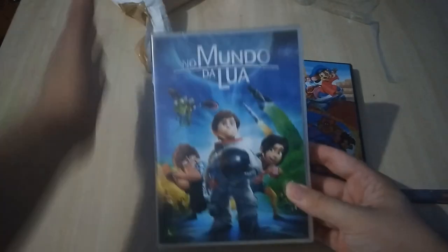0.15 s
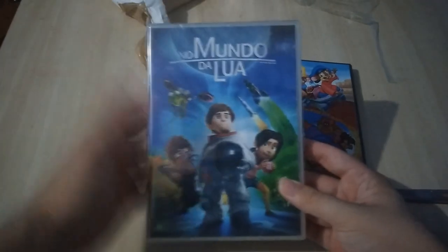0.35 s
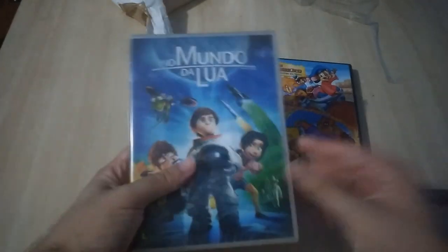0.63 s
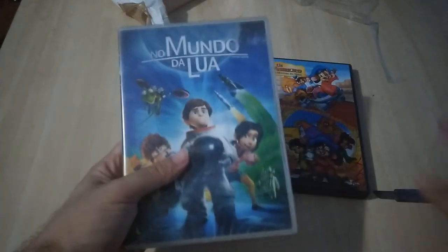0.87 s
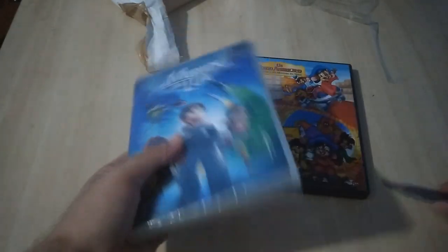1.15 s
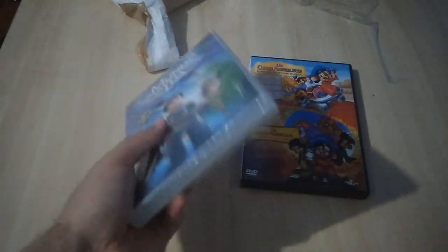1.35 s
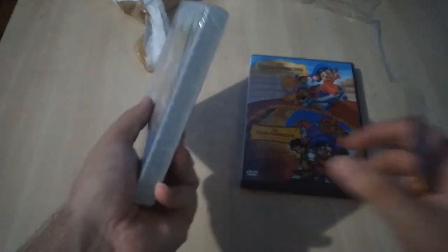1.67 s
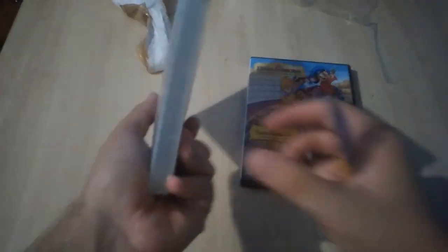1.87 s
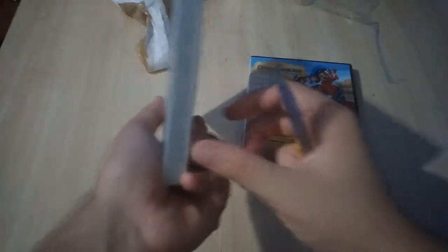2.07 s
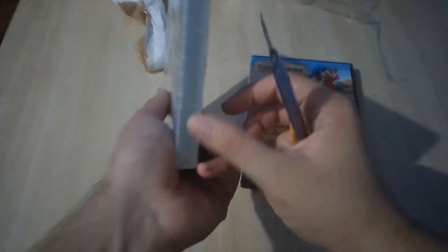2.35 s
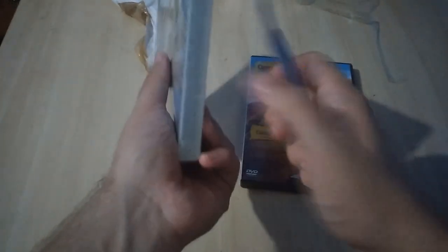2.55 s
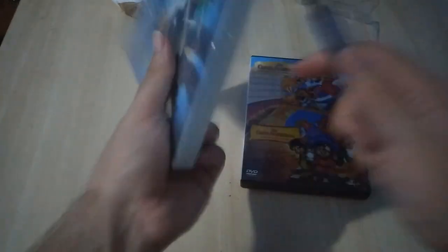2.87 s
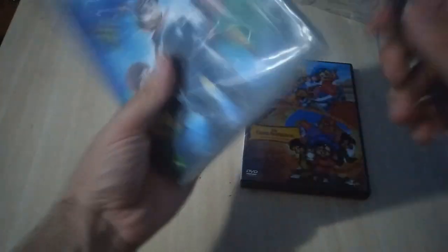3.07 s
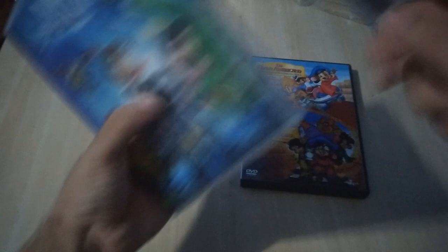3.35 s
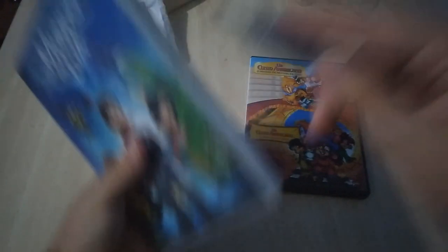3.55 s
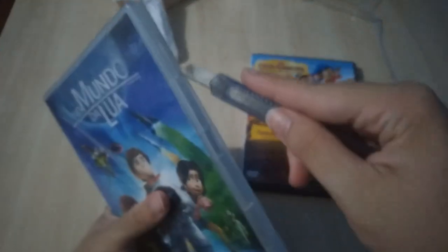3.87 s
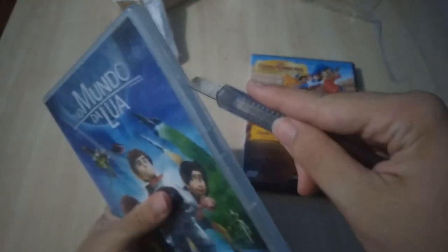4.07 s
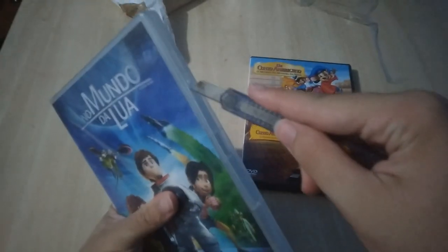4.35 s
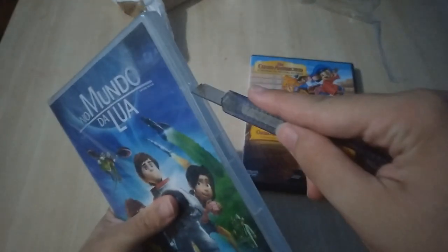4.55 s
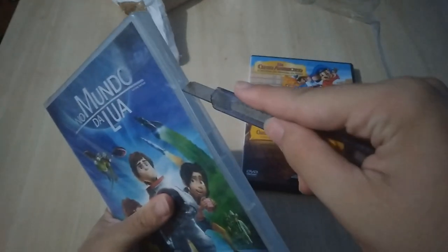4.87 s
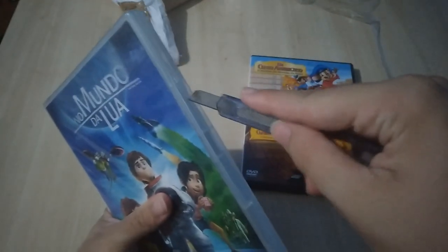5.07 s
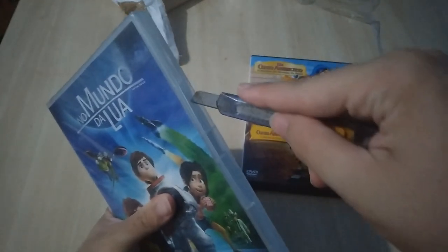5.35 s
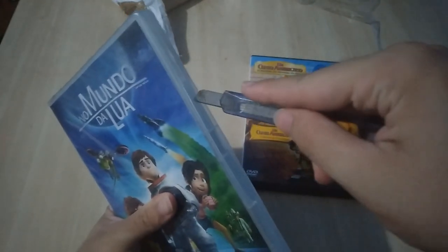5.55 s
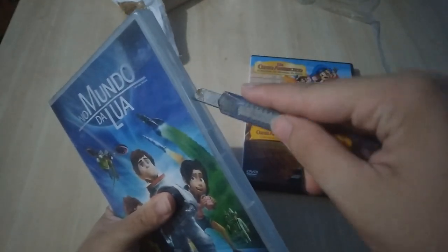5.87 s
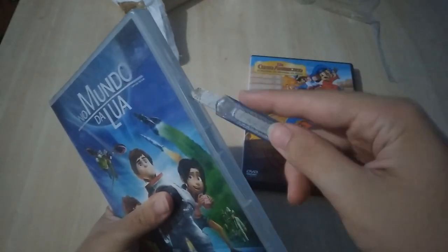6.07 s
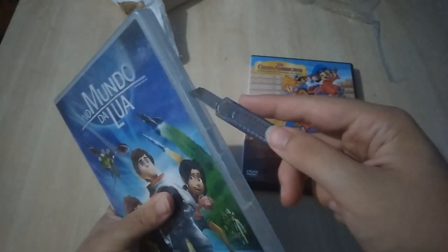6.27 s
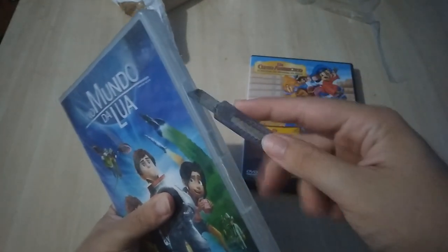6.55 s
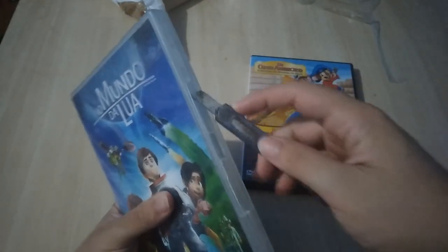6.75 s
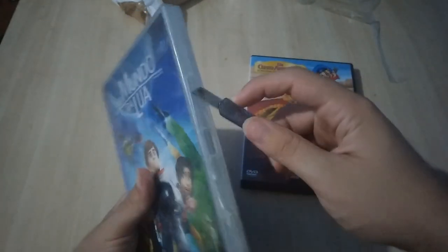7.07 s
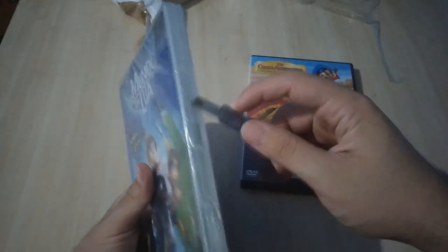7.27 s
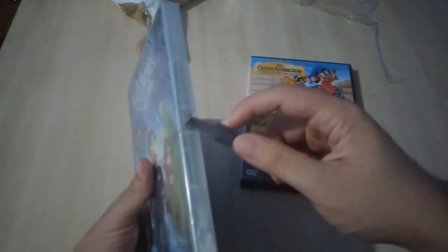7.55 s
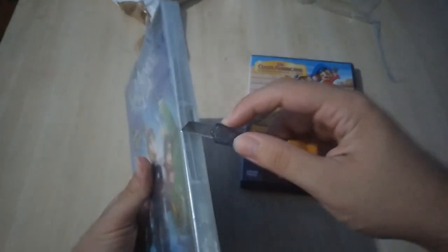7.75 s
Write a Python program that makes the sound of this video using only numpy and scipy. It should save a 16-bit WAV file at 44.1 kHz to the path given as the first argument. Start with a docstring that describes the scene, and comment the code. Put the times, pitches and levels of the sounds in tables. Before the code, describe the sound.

Crisp, very short snaps of thin plastic wrap and dull hollow knocks of a light case, heard very near with a short bright room tail. Crackling is thick until about three and a half seconds, then thins to isolated ticks from careful picking with a blade. One strong crack and knock interrupts, and crinkling returns at the end. Muffled low thuds, a brief hollow drone and faint distant toots sit underneath.

```python
"""A film-wrapped plastic case is turned in the hands and picked at with a knife, close to a stereo microphone.
The film snaps in short noise rattles and crinkles in random grains; the hollow case knocks in ringing modes.
A bare room answers with early echoes and a noise tail. Behind the walls low rumbles, a hum and a hollow
drone swell as resonant noise; faint toots of narrow noise come from afar, over a steady hiss."""
import sys
import numpy as np
from scipy import signal
from scipy.fft import rfft, irfft, next_fast_len
from scipy.io import wavfile
from scipy.ndimage import uniform_filter1d

SR = 44100
rng = np.random.default_rng(int(sys.argv[2]) if len(sys.argv) > 2 else 0)


def log_audio(samples):
    """Write samples as a 16-bit WAV file to the path given in sys.argv[1]."""
    # one column per channel
    frames = np.atleast_2d(samples).T
    # limit to full scale, then quantise
    limited = np.clip(frames, -1, 1)
    pcm = np.round(limited * 32767).astype(np.int16)
    wavfile.write(sys.argv[1], SR, pcm)


N = 348831

# film flexing between snaps: start_s, level_db
CRINKLE_LEVEL = [(0.0, -43), (0.31, -81), (0.59, -66), (1.08, -99), (1.28, -52.5), (2.77, -57.5),
                 (2.95, -41.5), (3.57, -72), (3.72, -89), (5.59, -67.5), (5.79, -79.5), (6.19, -84.5),
                 (6.39, -79.5), (6.83, -80.5), (7.29, -54.5), (7.53, -52), (7.71, -83), (7.91, -86)]
# colour of the crinkling film: pitch_hz, level_db (per Hz)
FILM_COLOUR = [(880, -53), (1500, -22.5), (1890, -28), (3120, -14.5), (4570, -20.5), (6890, -2.5),
               (9790, 2.5), (14600, -3.5), (16500, -21)]
GRAINS_PER_S, GRAIN_SPREAD_DB, GRAIN_MS, CRINKLE_ROOM_DB = 170, 8.5, 0.8, 2.5

# swells of the low rumble: start_s, level_db
RUMBLE_LEVEL = [(0.0, -85), (0.06, -57.5), (0.15, -44), (0.28, -64), (0.57, -78), (0.66, -54.5),
                (0.79, -73), (1.06, -69.5), (1.12, -54.5), (1.23, -71.5), (2.31, -68.5), (2.42, -58),
                (2.46, -74.5), (2.6, -45), (2.93, -71.5), (3.0, -47.5), (3.06, -60), (3.21, -49),
                (3.37, -60), (3.52, -44.5), (3.74, -51), (3.81, -64), (3.88, -51.5), (3.96, -59.5),
                (4.12, -45.5), (4.27, -61), (4.4, -73), (4.49, -49.5), (4.67, -55.5), (5.02, -59),
                (5.15, -72), (5.38, -55), (5.42, -41.5), (5.62, -65), (5.84, -73), (5.95, -55), (6.04, -65),
                (6.12, -46), (6.32, -68), (6.52, -61.5), (6.7, -71.5), (6.89, -55), (7.12, -76),
                (7.2, -65.5), (7.58, -68), (7.62, -53.5), (7.84, -73), (7.91, -57.5)]
# resonances of the low rumble: pitch_hz, width_hz, level_db
RUMBLE_MODES = [(35, 30, -23), (86, 14, -9.5), (112.6, 8.8, -8.5), (127, 12, -3.5), (139, 30, -7),
                (174.3, 18, -10.5)]
# swells of the hum above it: start_s, level_db
HUM_LEVEL = [(0.0, -83), (0.06, -47), (0.11, -40), (0.35, -93), (0.99, -68), (1.59, -91), (2.25, -70),
             (2.95, -70.5), (2.97, -62), (3.24, -69.5), (4.47, -80.5), (4.54, -68.5), (5.26, -81.5),
             (5.4, -54.5), (5.73, -89.5), (6.17, -68), (6.21, -77.5), (6.59, -63), (6.74, -79.5),
             (7.01, -50.5), (7.12, -81), (7.16, -55.5), (7.27, -64.5), (7.4, -50), (7.87, -65), (7.91, -54)]
# resonances of the hum: pitch_hz, width_hz, level_db
HUM_MODES = [(191, 24, -3), (236, 4.9, -1.5), (274.2, 25, -4.5)]

# colour of the hiss: pitch_hz, level_db (per Hz)
HISS_COLOUR = [(15, -30), (25, -13), (60, -3.5), (135, -7.5), (202, -3.5), (245, -9), (584, -11.5),
               (726, -16), (1600, -18.5), (4730, -25.5), (8830, -23.5), (14800, -43.5), (16500, -43.5)]
HISS_DB = -74   # level between 440 and 16000 Hz

# snaps of the film: start_s, level_db (peak before panning), body_db, lower_treble_db, top_db (all three
# re the main band), pan_db (left minus right), length_ms, room_db (send re level_db)
SNAPS = [(0.0004, -26.5, -8, -11, -26, -6, 1.04, 19), (0.0543, -20.5, -14, -9.5, -20, -2, 1.9, 19),
         (0.1023, -15.5, -4, -10, -23, 9, 2.76, 13), (0.1165, -23, -18, -18, -15, -16, 1.1, 15),
         (0.4524, -30.5, -3, -4, -25, 2.5, 4, 14), (0.579, -41, -31, -32.5, -2, -1.5, 1.9, 22.5),
         (0.6008, -25.5, -43, -34, -10, -12, 2.2, 15), (0.61, -31, -46, -27, -19, 14, 2.2, 17.5),
         (0.6582, -16, -36, -15, -19, -1, 1.74, 14), (0.671, -23, -42, -12, -12, 16, 2.9, 1),
         (0.6844, -20, -43, -18, -12, 8, 1.95, 6), (1.0688, -47, -24, -25, -20, 10.0, 1.4, 14),
         (1.0887, -17, -16, -17, -7, 4, 2.1, 17), (1.1042, -0.5, -22, -12, -30.5, 3.0, 2.18, 10),
         (1.265, -21, -20.5, -14.5, -22, 12, 2.3, 17.5), (1.2824, -22, -24, -15, -12, 5, 2.1, -1),
         (1.347, -28, -42, -8, -23, 8, 2.5, 12), (1.399, -29, -43, -36, -13, 6, 2.1, 10),
         (1.444, -24, -31, -19, -13, 1, 2.1, 11), (1.4711, -18, -28, -21, -10.5, 3, 2.5, 6.5),
         (1.5293, -20, -27, -27, -7, 13, 2.3, 3), (1.5335, -9, -25, -22, -12.5, -0.5, 2.95, 7),
         (1.5604, -34, -27, -30, -5, -1.5, 2.1, 5), (1.5842, -23, -22, -30, -5, 1.0, 1.9, 8),
         (1.6262, -39, -32, -24, 7, 4, 1.9, 5), (1.6401, -11.5, -41, -31, -4.5, -2, 2.4, -4),
         (1.6564, -22, -24, -12.5, -17, 5, 1.84, 14), (1.6651, -21, -35, -27, -25, -7, 1.4, 1),
         (1.6904, -24, -35, -14, -23, 4, 2.2, 11), (1.701, -21, -43, -33, -13, -19.5, 1.2, 4),
         (1.7393, -26.5, -34, -15, -12, 5, 1.6, 10), (1.7633, -24.5, -15, -16, -34, 3.0, 1.73, 12),
         (1.8093, -23, -35, -33, -17, -6, 1.4, 6), (1.8218, -24, -42, -42, -16, 0.5, 2, 2),
         (1.8453, -26, -39, -34, -9, 3, 1.9, 1), (1.8756, -16, -61, -53, -11, -15, 1.9, 4.5),
         (1.9069, -19, -33, -48, -18.5, 4, 2.17, 10.5), (1.9222, -22, -40, -29, -14, 7, 1.9, 5),
         (1.9891, -26, -49, -44, -17, 5, 2.9, 8), (2.043, -23.5, -36, -38, -16, -1.5, 3.1, 12),
         (2.1242, -38.5, -43, -36, -27, 10, 2.3, 7), (2.1813, -15, -23, -49, -7, -8, 2.3, 10.5),
         (2.2562, -16.5, -9.5, -24, -6, -1, 2.3, 1.5), (2.278, -26.5, -15, -28, -16, -13, 2, 9),
         (2.304, -19, -12.5, -33, -18, 1.5, 2.8, 6.5), (2.3111, -20.5, -36, -28, -11, -16, 2.2, 13.5),
         (2.3655, -25.5, -38, -29, -7, -1.5, 1.7, 1), (2.3965, -18, -52, -46, -8, -5, 1.9, 7),
         (2.4665, -11.5, -45, -29, -1, -2.0, 2.3, 7), (2.4907, -8, -23.5, -27, -10.5, -9.5, 2.73, 8.5),
         (2.5599, -12, -20.5, -19, -20, -2, 1.74, 8.5), (2.605, -27.5, -26, -12, -25, 11, 3.1, 8.5),
         (2.7306, -15.5, -19, -10, -28, -3.5, 1.7, 10), (2.7451, -27.5, -10, 1.5, -23, 13.5, 2.2, 11),
         (2.781, -19, -25, -29, -21, -7, 1.9, 12.5), (2.8251, -18, -12, -7, -12, 1, 1.3, 10),
         (2.8327, -5, -16, -23, -23, 8, 1.34, 8), (2.8564, -14, -19, -9, -14, -2, 1.4, 4),
         (2.88, -24, -31, -25, -24, 3.5, 1.9, 5), (2.9257, -21, -25, -26, -15, -1.5, 1.6, 3),
         (2.9503, -16, -27, -29, -15, 6, 2.8, 7), (2.9628, -12.5, -13, -17, -12, -5, 2.4, 8),
         (2.998, -14, -15.5, -7, -14, 6, 1.56, 11.5), (3.019, -17, -20, -22, -16, -13, 1.7, 1),
         (3.0784, -19.5, -20, -5, -27, 5, 1.9, 12.5), (3.0881, -13.5, -11, -6, -16, -4.5, 3.1, 8),
         (3.0928, -14, -23, -4, -7, 12, 2.4, 1), (3.1412, -20, -10, -8, -20, -1, 2.1, 11.5),
         (3.1502, -24, -10, -11, -24, 9, 2, 9), (3.1687, -31, -3, -3, -21, 6, 2, -1),
         (3.2198, -26, -22, -9, -16, -13, 2.2, 11), (3.2247, -30.5, -15, 7, -15, 14, 4.1, 3),
         (3.2857, -34, -38, -13, -18, 8, 1.9, 14), (3.3226, -31.5, -42, -17, -21, -2, 1.9, 3),
         (3.3433, -25.5, -52, -23, -6, 6, 1.64, 10), (3.3523, -26.5, -58, -10.5, -20, -4, 2.1, 10),
         (3.423, -27, -15.5, -29, -12, -2, 2.2, 8.5), (3.4345, -26.5, -47, -28, -13, 6, 2.4, 17),
         (3.556, -37.5, -49, -49, -11, -19, 2.1, 14), (3.6107, -26.5, -29, -40, -17, 0.5, 1.8, 13),
         (3.6424, -40, -40, -29, -16, -4, 1.5, 10), (3.676, -34.5, -41, -19, -14, -10, 2.2, 8),
         (3.686, -34, -48, -8, -21, 12, 1.46, 6.5), (3.9053, -46.5, -8, -11, -27, 7, 2.2, 14),
         (3.987, -23, -52, -13, -24, -0.5, 2.3, 10.5), (4.0322, -22.5, -47, -8.5, -25, -4.5, 1.4, 4.5),
         (4.149, -37.5, -29, -10, -15.5, 2.5, 1.3, 15.5), (4.1647, -32.5, -39, -5, -23, -19, 1, 1.5),
         (4.326, -27.5, -47, -17.5, -12.5, -8.5, 1.47, 11), (4.5366, -33.5, -37, -34, -23, 9.5, 1.8, 15.5),
         (4.576, -27.5, -22, -21, -34, 0, 1.9, 8.5), (4.6428, -21.5, -51, -18, -12, -6, 2.3, 7),
         (4.7381, -29, -41, -36, -19.5, -5, 1.92, 1.5), (5.0295, -19.5, -33, -17.5, -21, -9.5, 1.8, 11.5),
         (5.0548, -22, -26, -6.5, -20, 2.5, 2.2, 6.5), (5.113, -24.5, -41, -21, -29, -4, 2.8, 4.5),
         (5.1939, -27.5, -7, -18, -28.5, -1, 2.2, 5), (5.3861, -1.5, -16.5, -16.5, -10, -4, 2.75, 9.5),
         (5.392, -10, -19, -6, -23, 9, 2.4, 8), (5.3983, -6.5, -19, -19, -16.5, 6, 1.5, 22.5),
         (5.406, -23, -33, -25, -17, -12, 1.6, 13), (5.4107, -7.5, -31, -17, -14, -8, 1.9, 17.5),
         (5.8493, -41.5, -11, -7, -28, 6, 2.6, 10), (6.1728, -14, -52, -23, -32, 6.5, 1.46, 8),
         (6.197, -32, -33, -14, -20, -1, 1.9, 13), (6.2176, -22, -27, -16, -20, 1, 3.1, 7.5),
         (6.232, -29, -38, -22.5, -27, 3.5, 1.9, 9), (6.254, -26.5, -46, -32, -34.5, 7.0, 1.6, 3),
         (6.3765, -43, -24, -1.5, -49, 8, 2.2, 9.5), (6.4556, -22, -46, -12.5, -24, 2.5, 2.46, 9.5),
         (6.5325, -29, -19, -20.5, -17.5, -1, 1.87, 9), (6.5791, -25, -47, -6, -33.5, 5, 3.1, 8.5),
         (6.7531, -38.5, -32.5, -16, -11.5, 9.5, 1.9, 16.5), (6.8533, -42, -34, -31.5, -9, 6, 1.5, 20),
         (6.8969, -28.5, -50, -34, -18, 10, 2.4, 16.5), (6.988, -35, -42, -40, -24, -3.5, 2.6, 4),
         (7.0585, -39.5, -41, -38, -8, -20, 1.3, 20.5), (7.1062, -18, -17.5, -9.5, -25, 2.5, 2.44, 12),
         (7.1202, -23.5, -5, -10, -10, 0, 2.4, 5), (7.1469, -8.5, -9, -5.5, -21, -1.0, 2.76, 5),
         (7.1632, -21, -20, -9, -24, 5, 2.1, 3), (7.2284, -39, -19, -26, -16, -1, 1.9, 7),
         (7.2993, -33.5, -37, -8, -19, -6, 1.5, 17.5), (7.3358, -34, -26, -17, -17, -4, 1.6, 22.5),
         (7.3569, -13.5, -14.5, -15.5, -21.5, -4, 1.78, 8), (7.4233, -30, -40, -29, -34, 2, 2, -2),
         (7.4854, -33, -22, -22, -12, -6, 1.6, 11), (7.5005, -10, -15, -16.5, -23, 2, 1.4, 10.5),
         (7.512, -12, -7, -25, -5, -3, 3.4, -1), (7.5217, -5.5, -15.5, -11, -17, 1, 3.2, 5.5),
         (7.5654, -17, -32, -32, -12, 8, 1.9, 11.5)]
CRACK = 0.54   # one sharp slip at the height of each rattle, re a rattle of unit energy
CENTRE_HZ, CENTRE_HZ_PER_DB, USUAL_TOP_DB = 8014, 56.5, -14   # a snap with more top also sits higher

# decay of the room: pitch_hz, t60_s
ROOM_DECAY = [(150, 0.39), (500, 0.48), (2000, 0.5), (5000, 0.52), (9000, 0.44), (15000, 0.21)]
# table top and near walls: delay_s, level_db
ECHOES = [(.0017, -8), (.0068, -24), (.0095, -62.5)]
ROOM_DB, ROOM_BUILD_S, ROOM_FADE_DB = -33.5, 0.00087, 902.5   # tail level, time to fill, extra fall per s cubed
LEFT_LAG = 7   # samples

# knocks of the case: start_s, level_db (before a fixed trim), low_thump_db, upper_modes_db (re middle modes)
KNOCKS = [(0.056, -33.5, 7.5, 0), (0.089, -37.5, 8.5, 9.5), (0.107, -24, -1.5, 1.5), (0.456, -42.5, -30, 3),
          (0.489, -49, -35, -20), (1.106, -48, -8, 16), (1.267, -58.5, -5, 12), (1.535, -58.5, -7, 18),
          (1.641, -54, -15, 13), (2.04, -50.5, -18, 7), (2.199, -58.5, -7.5, 14), (2.302, -54, 5, 7.5),
          (2.491, -51, -2, -22), (2.937, -55.5, -3, 13), (2.963, -41.5, -12, 5), (3.087, -56.5, -0.5, 10),
          (3.168, -49.5, -9, -27), (3.905, -71, -8, 25), (4.573, -72, -7, 29), (5.051, -54.5, -27, 16),
          (5.387, -26, -7.5, 12), (5.409, -26.5, -10, 0), (6.219, -46, -22, 4), (7.105, -46.5, -27, -4.5),
          (7.146, -54, 0, 14), (7.37, -54.5, -6, 9), (7.521, -33, -7.5, 3.5)]
# ringing modes of the hollow case: pitch_hz, level_db, t60_s
CASE_MODES = [(205, -20, .05), (253, 4, 0.069), (337, 7.5, 0.12), (409, 7, 0.05), (481.5, 10, 0.034),
              (720.4, -7.5, 0.13), (798.7, 8.5, 0.076), (916, 20, 0.012), (1097, 17.5, 0.0093),
              (1254, 1.5, 0.02), (1335, 6.5, 0.011), (1601, 8.5, .025), (2170, 2.5, 0.017),
              (3170, -4, .025)]
SLAP_DB = 10   # re the modes of the case

# faint toots from afar: centre_s, level_db, pitch_hz, length_s
TOOTS = [(1.063, -70, 787, 0.18), (1.231, -59, 800, 0.041), (1.478, -57, 845, 0.081),
         (1.856, -63.5, 815, 0.15), (2.473, -63, 780, 0.09), (3.07, -61, 802, 0.032),
         (3.215, -70, 803, 0.27), (3.707, -65.5, 770, 0.11), (4.321, -63, 774, 0.032),
         (4.276, -70.5, 593, 0.13), (5.84, -72.5, 600, .08), (6.88, -62, 784, 0.087)]
# swells of the hollow drone: start_s, level_db
DRONE_LEVEL = [(1.8, -87), (1.884, -68), (1.94, -79), (2.086, -55), (2.182, -62), (2.298, -51.5),
               (2.45, -81)]
# resonances of the drone: pitch_hz, width_hz, level_db
DRONE_MODES = [(308, 13, -20), (367, 18.6, 3.5), (418.5, 18, -10), (463.7, 9.3, -0.5)]

# colour difference of the microphone's ports: pitch_hz, left_minus_right_db
PORT_COLOUR = [(60, 4), (200, 6.5), (700, 1), (2400, 6.5), (4500, 4), (6500, 8.5), (8500, 1), (10500, -7),
               (15000, 4)]
CUTOFF_HZ = 16750


def from_db(db):
    """Decibels to an amplitude factor."""
    return 10 ** (np.asarray(db) / 20)


def rms_one(x):
    """Scale to an overall rms of one."""
    return x / np.sqrt(np.mean(x ** 2) + 1e-20)


def unit(x):
    """Scale each row to unit energy."""
    return x / np.linalg.norm(x, axis=-1, keepdims=True)


def level_curve(rows):
    """A level in dB at every sample; silent outside its span, but held if it reaches the end of the scene."""
    s, level_db = np.transpose(rows)
    after_db = level_db[-1] if s[-1] > 7.8 else -150
    return np.interp(np.arange(N) / SR, s, level_db, left=-150, right=after_db)


def at_hz(points, hz):
    """Read a spectrum at any pitch, on a log pitch scale."""
    pitch_hz, values = np.transpose(points)
    return np.interp(np.log(hz), np.log(pitch_hz), values)


def high_pass(x, hz):
    """Gently remove what lies below a pitch."""
    return signal.sosfilt(signal.butter(2, hz, "high", fs=SR, output="sos"), x)


def band(x, low_hz, high_hz):
    """Keep one band of the spectrum."""
    edges = [low_hz, min(high_hz, .45 * SR)]
    return signal.sosfilt(signal.butter(2, edges, "band", fs=SR, output="sos"), x)


def steep_band(x, low_hz, high_hz):
    """A band with a sharper lower edge, of unit energy."""
    return unit(high_pass(band(x, low_hz, high_hz), low_hz * 0.79))


def colour(x, points):
    """Tilt a sound by a spectrum in dB."""
    size = next_fast_len(x.shape[-1])
    hz = np.arange(1, size // 2 + 2) * SR / size
    tilted = irfft(rfft(x, size) * from_db(at_hz(points, hz)), size)
    return tilted[..., :x.shape[-1]]


def resonate(x, hz, width_hz):
    """A single resonance: the narrower it is, the longer it rings."""
    r = np.exp(-np.pi * width_hz / SR)
    return signal.lfilter([1 - r * r, 0, r * r - 1], [1, -2 * r * np.cos(2 * np.pi * hz / SR), r * r], x) / 2


def add(out, near, far, s, pan_db, room_db):
    """Mix a short sound in at a time: rows left, right and what goes into the room."""
    i = round(s * SR)
    gains = from_db([[pan_db / 2], [-pan_db / 2], [room_db]])
    out[:, i:i + len(near)] += gains * np.array([near, near, far])[:, :N - i]


def crinkle():
    """Tiny creases at random moments, of very uneven size and side, their colour changing every few ms."""
    sizes = from_db(GRAIN_SPREAD_DB * np.minimum(rng.exponential(1, N), 3))
    starts = rng.random(N) < GRAINS_PER_S / SR
    sides = from_db(rng.normal(0, 9.0, N) * [[1], [-1], [0]])   # left, right, room
    fade = np.exp(-1000 / (GRAIN_MS * SR))
    envelopes = signal.lfilter([1], [1, -fade], sizes * starts * sides + 1e-18)
    grains = envelopes * rng.standard_normal(N)

    # deal stretches of 256 samples among six bands
    dealt = rng.integers(0, 6, N // 256 + 1).repeat(256)[:N]
    coloured = 0
    for k, hz in enumerate(np.geomspace(3500, 12000, 6)):
        coloured = coloured + band(grains * (dealt == k), hz / 1.48, hz * 1.53) / np.sqrt(hz)

    # the minimum-phase step halves the dB, so they go in doubled
    film_hz, film_db = np.transpose(FILM_COLOUR)
    taps = signal.firwin2(255, np.r_[0, film_hz, SR / 2], np.r_[0, from_db(2 * film_db), 0], fs=SR)
    shape = signal.minimum_phase(taps)
    film = rms_one(signal.fftconvolve(coloured, shape[None], axes=1)[:, :N])
    return from_db(level_curve(CRINKLE_LEVEL) + [[0], [0], [CRINKLE_ROOM_DB]]) * film


def boom(modes, level_db, side_db):
    """Noise ringing in a few low resonances, nearly alike on both sides; its swells follow the level curve."""
    white = rng.standard_normal((2, N))
    ringing = 0
    for k, (hz, width_hz, db) in enumerate(modes):
        mode = resonate(resonate(white, hz, width_hz), hz, 4 * width_hz) / np.sqrt(width_hz)
        ringing = ringing + from_db(db) * (-1) ** k * mode
    # even out the noise's own swells
    power = uniform_filter1d(uniform_filter1d(ringing ** 2, size=3000), size=3000)
    mid, side = ringing / np.sqrt(power + 0.033 * power.mean())
    return from_db(level_db) * (mid + from_db(side_db) * side * [[1], [-1]])


def rumble():
    """Deep resonant noise behind the walls, with a slightly wider hum above it."""
    deep = boom(RUMBLE_MODES, level_curve(RUMBLE_LEVEL), side_db=-17.0)
    return deep + boom(HUM_MODES, level_curve(HUM_LEVEL), side_db=-9)


def hiss():
    """Steady coloured noise, independent on each side."""
    noise = colour(rng.standard_normal((2, N)), HISS_COLOUR)
    return from_db(HISS_DB) * noise / np.std(band(noise, 440, 16000))


def snaps():
    """A crease lets go: a rattle of a millisecond or a few that swells fast and dies, in four parts of the spectrum."""
    out, ms = np.zeros((3, N)), np.arange(900) / SR * 1000
    noise = rng.standard_normal((len(SNAPS), 900))
    for (s, db, body_db, lower_db, top_db, pan_db, length_ms, room_db), grit in zip(SNAPS, noise):
        hz = np.clip(CENTRE_HZ + CENTRE_HZ_PER_DB * (top_db - USUAL_TOP_DB), 6500, 10500)
        rise = ms / (0.44 * max(length_ms, .1))
        rattle = unit(grit * rise * np.exp(-rise))
        near_push = rattle + CRACK * (np.arange(900) == rise.searchsorted(1))
        # the room averages all directions: a more even spectrum
        room_push = (ms == 0) + 0.52 * rattle
        pushes = np.array([near_push, room_push])

        # neighbouring bands alternate in sign
        body = from_db(body_db) * steep_band(pushes, 2300, 3570)
        lower = from_db(lower_db) * steep_band(pushes, 3690, 5640)
        main = steep_band(pushes, hz / 1.126, hz * 1.34)
        top = from_db(top_db) * steep_band(pushes, 13000, 17320)
        near, far = main - lower + body - top
        add(out, from_db(db) * near / np.abs(near).max(), from_db(db) * far, s, pan_db, room_db)
    return out


def room(x):
    """A few early echoes, then a noise tail of its own for each side that fills, then dies band by band, ever faster."""
    t, edges = np.arange(SR // 2) / SR, 100 * 2 ** np.arange(0, 7.6, .5)
    white = rng.standard_normal((2, 2, len(t)))
    tail = 0
    for k, (low, high) in enumerate(zip(edges, edges[1:])):
        t60 = at_hz(ROOM_DECAY, np.sqrt(low * high))
        tail = tail + band(white[k % 2], low, high) * from_db(-60 * t / t60)
    build = (1 - np.exp(-t / ROOM_BUILD_S)) ** 2
    tail = from_db(ROOM_DB - ROOM_FADE_DB * t ** 3) * tail * build

    direct = x[:2].copy()
    for s, db in ECHOES:
        direct += from_db(db) * np.roll(x[:2], round(s * SR), axis=1)
    direct[0] = np.roll(direct[0], LEFT_LAG)   # the case is nearer the right port
    return direct + signal.fftconvolve(x[2:], tail, axes=1)[:, :N]


def knocks():
    """Each knock is a short uneven contact that strikes every mode of the case with a strength of its own."""
    out, t = np.zeros((3, N)), np.arange(3000) / SR
    spread = rng.normal(0, 2, (len(KNOCKS), len(CASE_MODES)))
    contacts = rng.standard_normal((len(KNOCKS), 3000)) * np.exp(-t / 0.0099)
    for (s, db, low_db, high_db), chance_db, contact in zip(KNOCKS, spread, contacts):
        ring = 0
        for k, ((hz, mode_db, t60), extra_db) in enumerate(zip(CASE_MODES, chance_db)):
            part_db = low_db if hz < 600 else high_db if hz > 1250 else 0
            envelope = from_db(part_db + mode_db + extra_db - 60 * t / t60)
            ring = ring + (-1) ** k * envelope * np.sin(2 * np.pi * hz * t)
        ring = ring + from_db(SLAP_DB) * band(contact, 600, 3200)   # the dry slap of the contact itself
        rattled = signal.fftconvolve(ring, unit(contact))[:len(t)]
        add(out, from_db(db - 15.5) * (ring + 0.86 * rattled), from_db(db - 12.5) * ring, s, 0, 0)
    return high_pass(out, 140)


def toots():
    """Soft swells of narrow noise, different on each side."""
    out, t = np.zeros((2, N)), np.arange(8000) / SR - .09
    for s, db, hz, length in TOOTS:
        noise = rng.standard_normal((2, 12000))
        # skip the start, where the resonances are still building
        tone = rms_one(resonate(resonate(noise, hz, 50), hz, 110)[:, 4000:])
        i = round((s + t[0]) * SR)
        out[:, i:i + len(t)] += from_db(db) * tone * np.exp(-(t / (.5 * length)) ** 2)
    return out


def drone():
    """A hollow drone of resonant noise that swells within a short stretch, wider than the rumble."""
    return boom(DRONE_MODES, level_curve(DRONE_LEVEL), side_db=-4)


def scene():
    """Film and case sound in the room; rumble, drone, toots and hiss are laid on top without it."""
    handling = room(crinkle() + snaps() + knocks())
    return handling + rumble() + hiss() + toots() + drone()


def record(dry):
    """The microphone's two ports differ in colour; peaks are rounded, the top is cut."""
    ports = []
    for side, sign in zip(dry, (1, -1)):
        ports.append(colour(side, [(hz, sign * db / 2) for hz, db in PORT_COLOUR]))
    rounded = .8 * np.tanh(np.array(ports) / .8)
    return signal.sosfilt(signal.cheby2(14, 60, CUTOFF_HZ, fs=SR, output="sos"), rounded)


dry = scene()
out = record(dry)
log_audio(out)
```